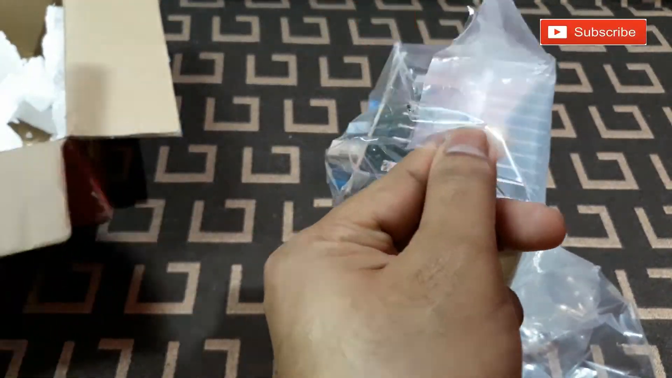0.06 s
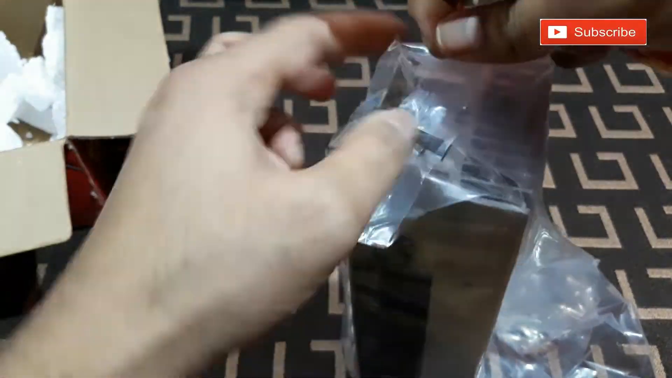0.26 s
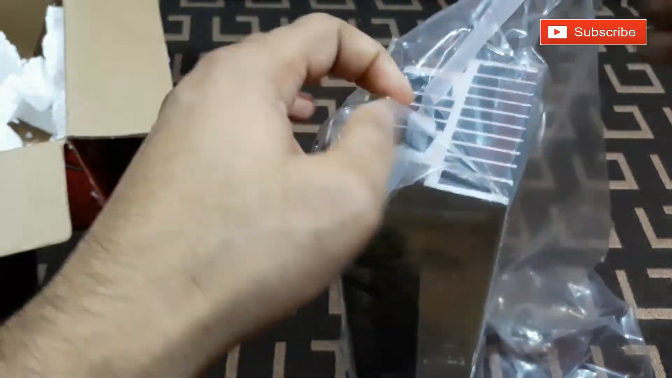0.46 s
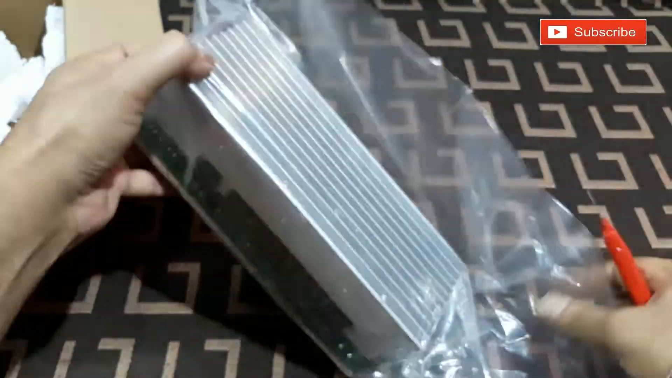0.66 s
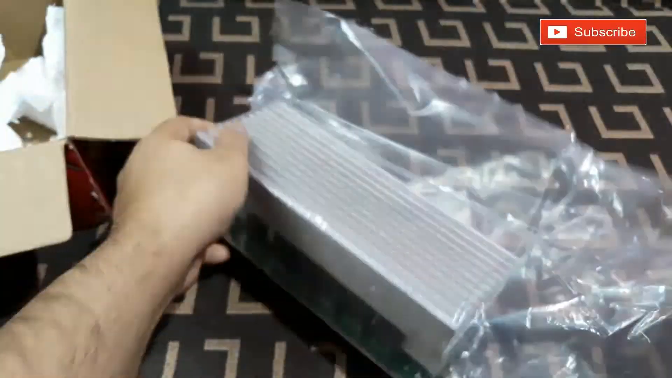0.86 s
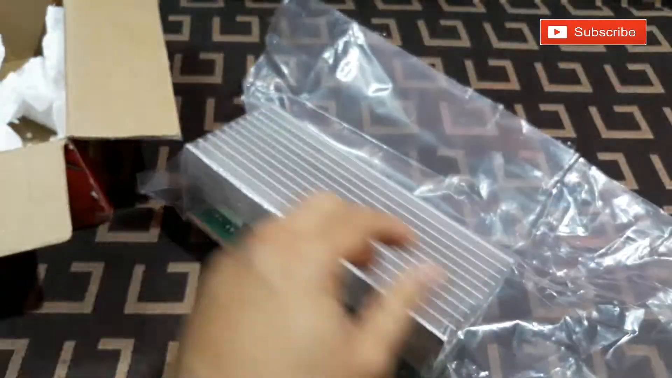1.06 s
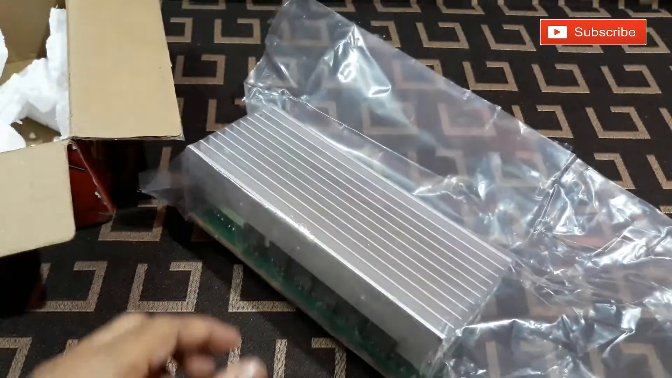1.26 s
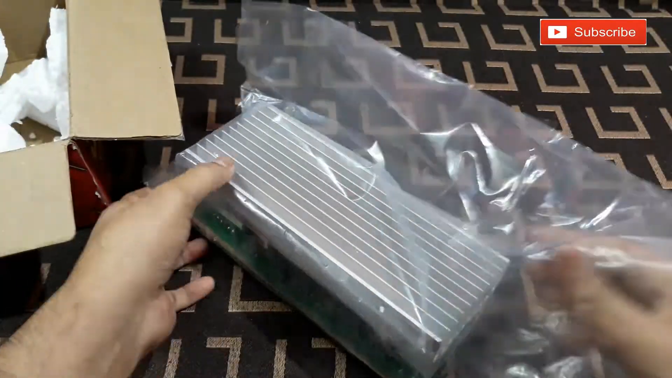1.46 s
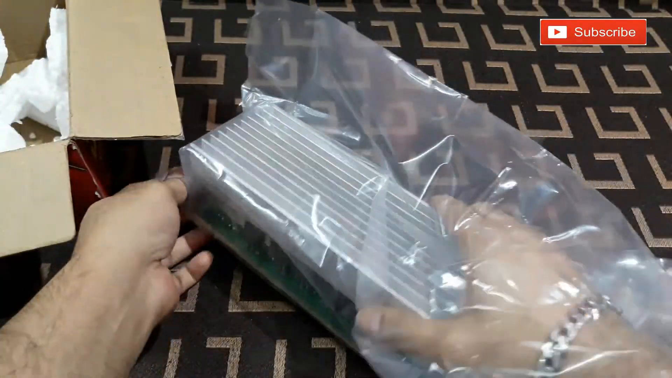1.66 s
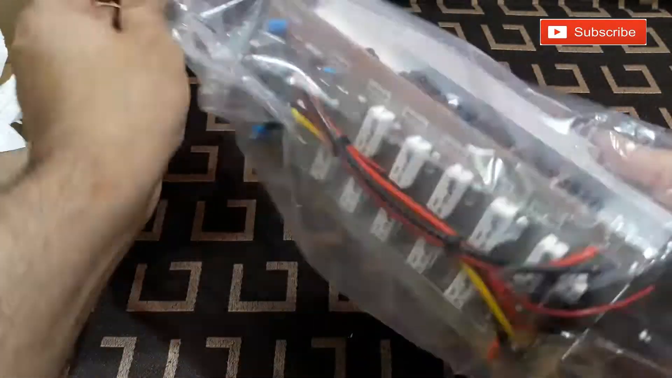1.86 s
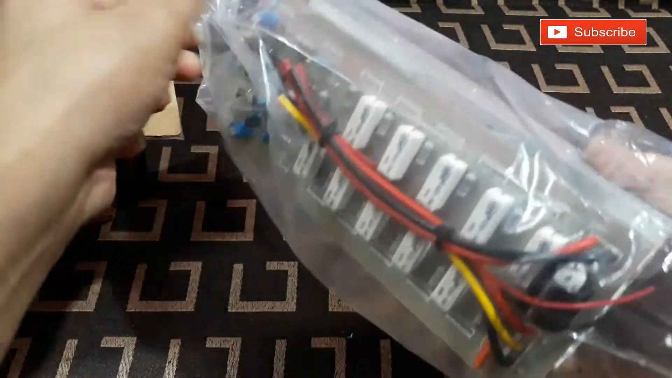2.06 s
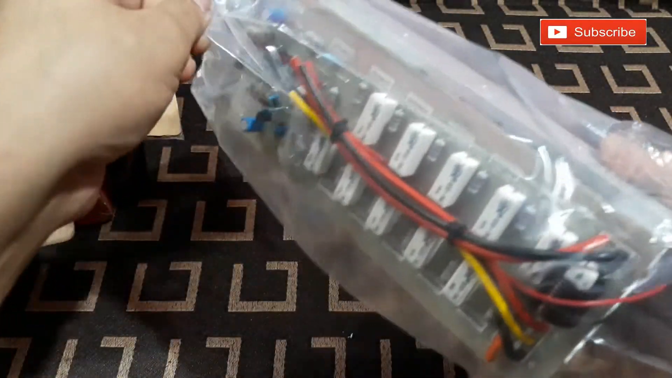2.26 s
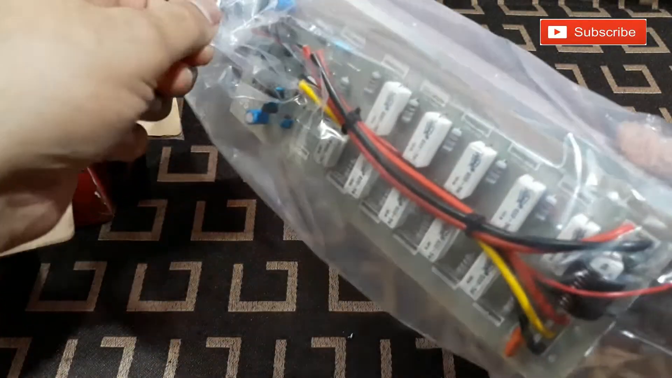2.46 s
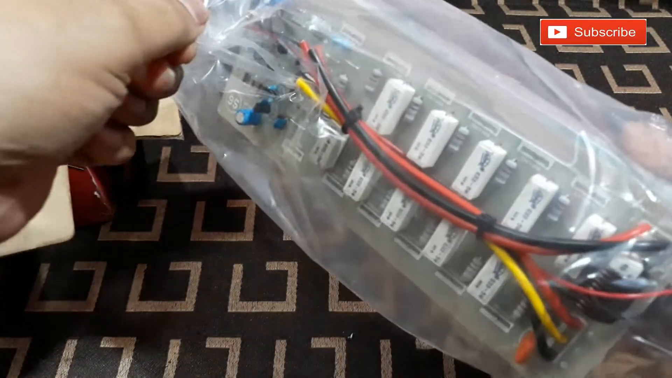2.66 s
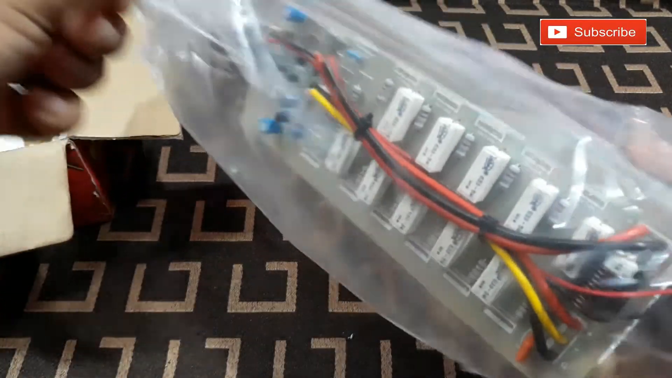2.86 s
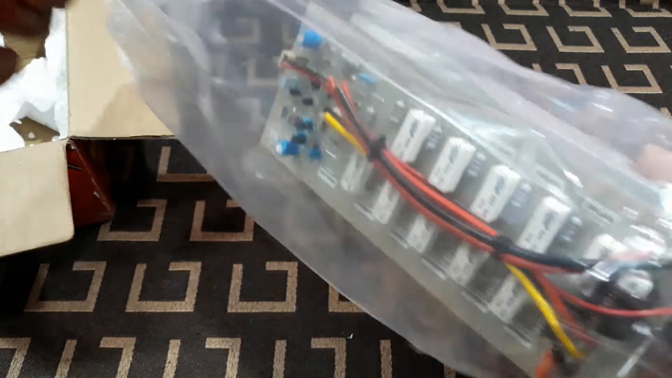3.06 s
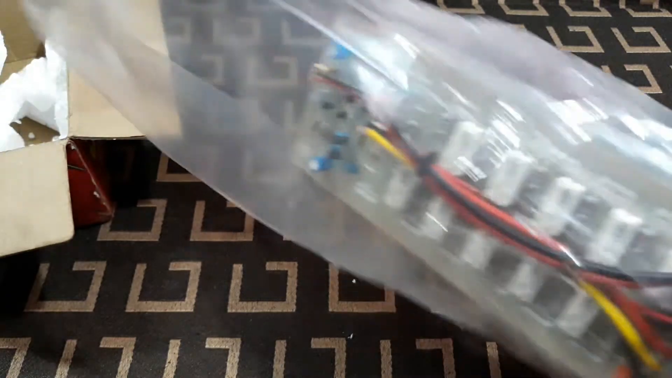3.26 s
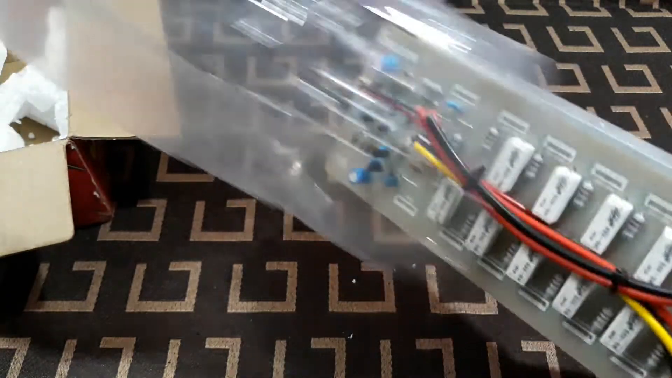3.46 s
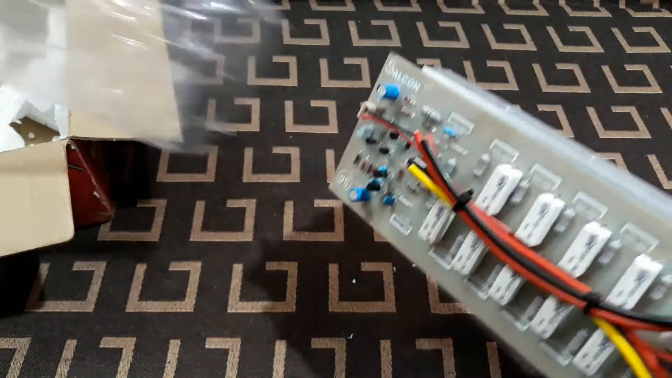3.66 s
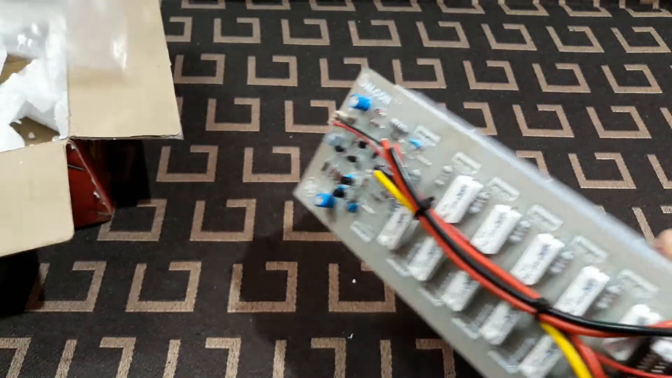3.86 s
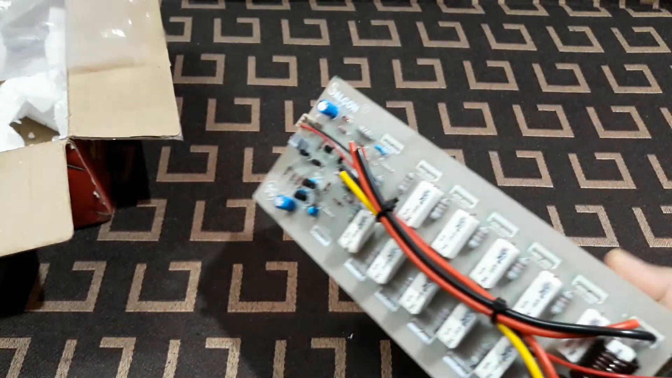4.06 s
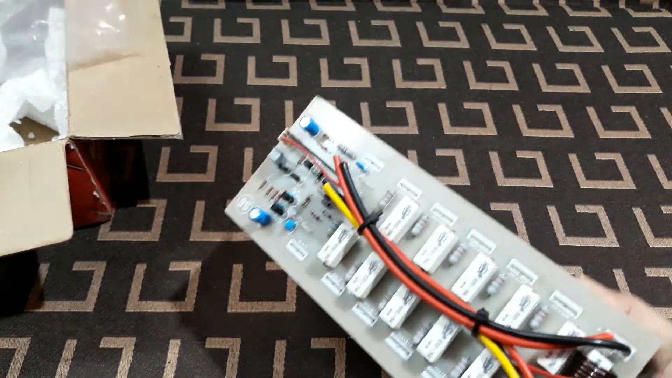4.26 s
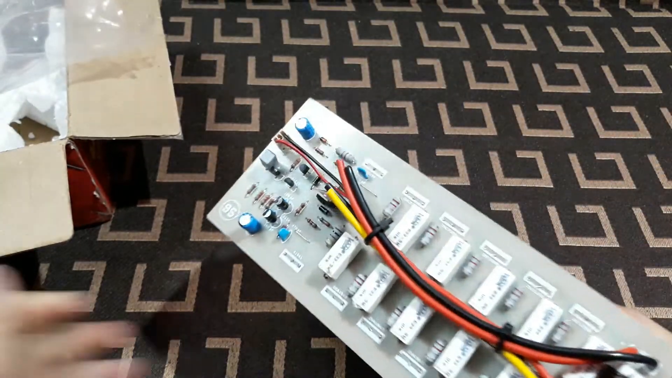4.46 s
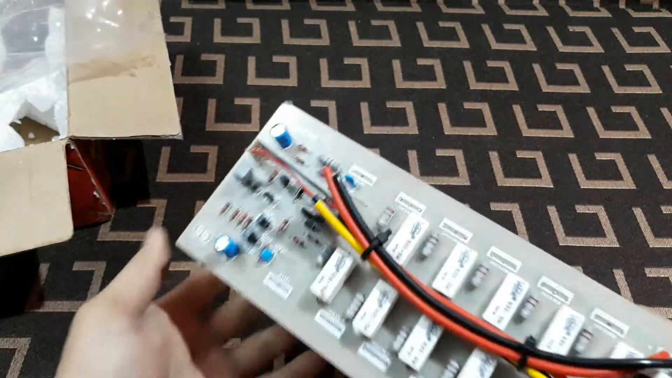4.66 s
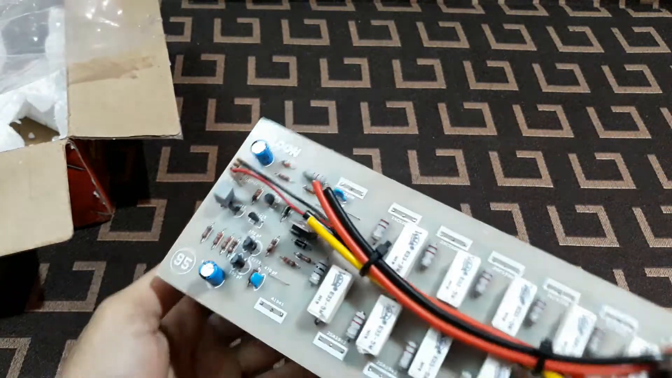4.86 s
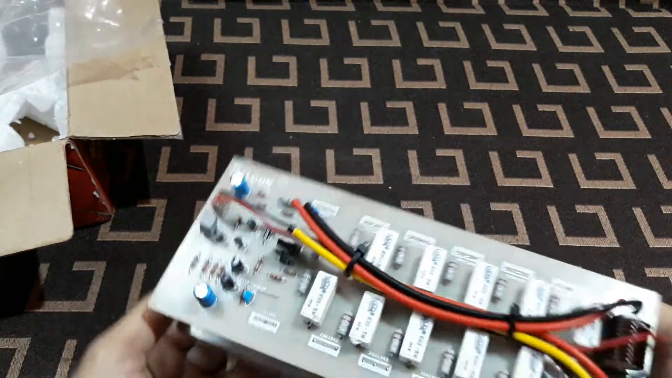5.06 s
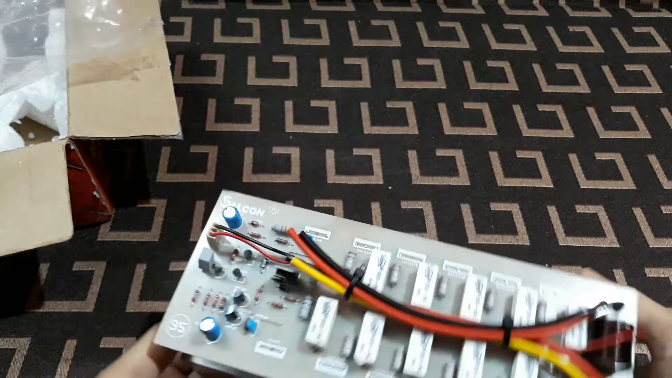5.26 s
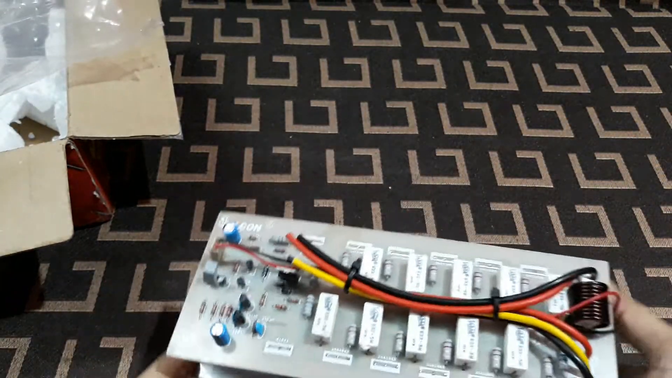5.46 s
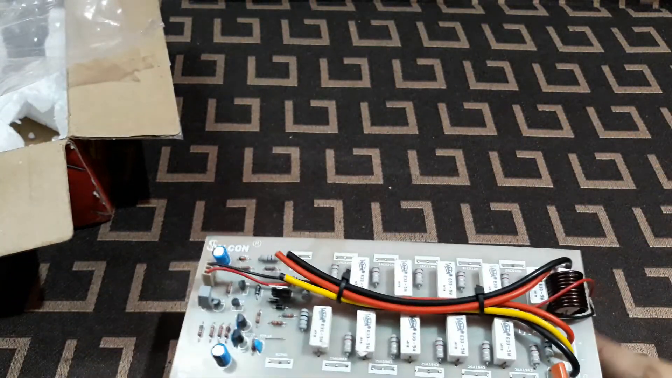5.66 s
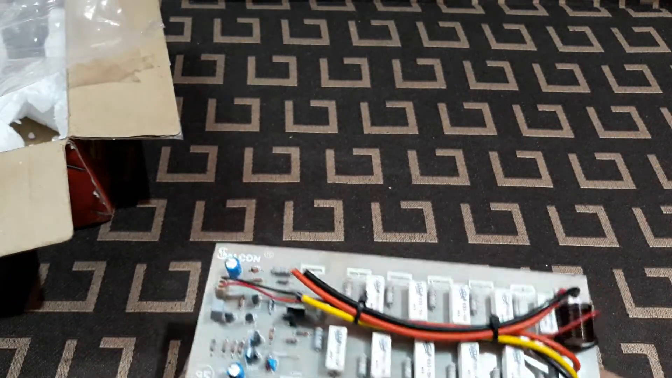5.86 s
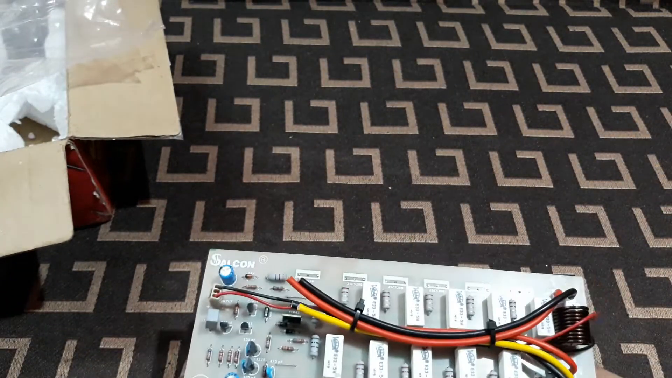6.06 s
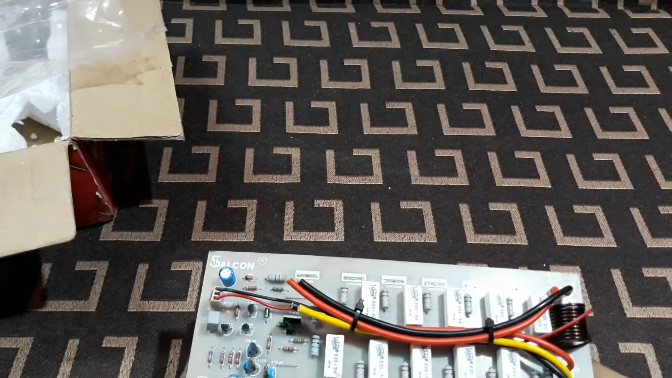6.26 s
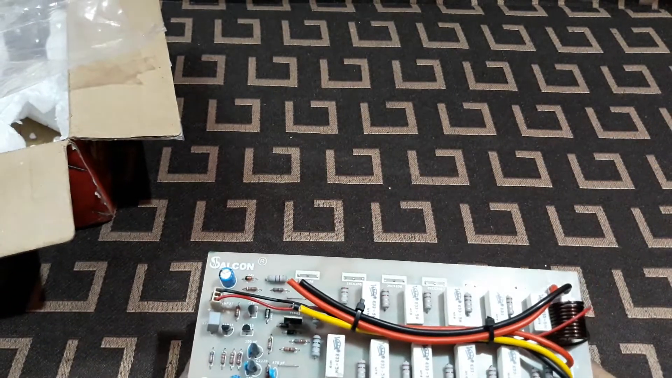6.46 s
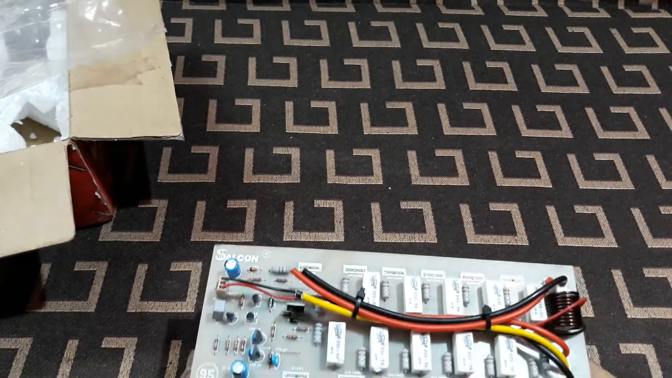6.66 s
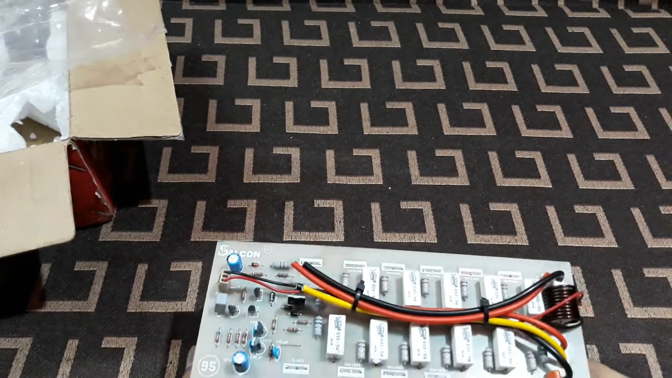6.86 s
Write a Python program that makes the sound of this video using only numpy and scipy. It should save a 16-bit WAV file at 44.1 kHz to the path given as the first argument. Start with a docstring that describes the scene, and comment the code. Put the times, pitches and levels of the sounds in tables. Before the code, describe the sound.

Hands tear and crumple stiff clear plastic film in bright crackles and snaps, then fingers softly rub and tap a finned metal board.

```python
"""Unwrapping a finned board

Hands tear and crumple a clear plastic bag close to a phone in a carpeted room and pull a finned board out.
Clumped creases and filtered noise make the film rustle; ringing noise bursts make it snap, low noise thumps.
Damped sines knock as a cutter is put down and the load picked up; rough tones chirp as taut film slides off.
Then fingers slide over the board, with noise and squeaky sines, and rub and tap its resonant fins. Wavering
mains tones and a faint hiss are the room; at times the stereo image narrows to the centre."""
import sys
import numpy as np
from scipy import signal
from scipy.fft import rfft, irfft, next_fast_len
from scipy.io import wavfile
from scipy.ndimage import uniform_filter1d, map_coordinates

SR = 44100
rng = np.random.default_rng(int(sys.argv[2]) if len(sys.argv) > 2 else 0)


def generate_wav(sig):
    """Save sig (samples, or channels by samples) to the path in sys.argv[1] as 16-bit PCM at SR."""
    pcm = np.round(np.clip(np.atleast_2d(sig).T, -1, 1) * 32767).astype(np.int16)
    wavfile.write(sys.argv[1], SR, pcm)


N = 304727


def amp(db):
    """Gain of a level in dB."""
    return 10 ** (np.asarray(db) / 20)


def unit(x):
    """x at rms 1."""
    return x / np.sqrt(np.mean(x ** 2) + 1e-20)


def along(points, hz):
    """Values at hz, joined through (Hz, value) points on a log axis."""
    f, v = np.transpose(points)
    return np.interp(np.log(hz + 1), np.log(f + 1), v)


def curves(rows):
    """One curve for each column after the time, and a soft-edged gate open while the rows last."""
    s, *cols = np.transpose(rows)
    t = np.arange(N) / SR
    is_open = 1. * (t >= s[0]) * (t <= s[-1])
    gate = uniform_filter1d(is_open, size=600, mode="nearest")
    return [np.interp(t, s, c) for c in cols] + [gate]


def wobble(rate):
    """A smooth random curve, rate knots a second."""
    knots = rng.standard_normal(int(N * rate / SR) + 4)
    return map_coordinates(knots, [np.arange(N) * rate / SR])


def filtered(x, response):
    """x times a response of frequency."""
    m = next_fast_len(x.shape[-1] + 8192)
    spectrum = rfft(x, m) * response(np.fft.rfftfreq(m, 1 / SR))
    return irfft(spectrum, m)[..., :x.shape[-1]]


def causal(spectrum):
    """Minimum-phase impulse response with this spectrum, by folding its cepstrum."""
    db = np.maximum(along(spectrum, np.fft.rfftfreq(2048, 1 / SR)), -60)
    cepstrum = irfft(np.log(amp(db)))
    cepstrum[1:1024] *= 2
    cepstrum[1025:] = 0
    return irfft(np.exp(rfft(cepstrum)))[:1024]


def thirds(x):
    """Low, middle and treble parts of x, each scaled to rms 1."""
    low = signal.sosfilt(signal.butter(5, 1500, "low", fs=SR, output="sos"), x)
    mid = signal.sosfilt(signal.butter(5, [1500, 8700], "band", fs=SR, output="sos"), x)
    top = signal.sosfilt(signal.butter(3, 8700, "high", fs=SR, output="sos"), x)
    return unit(low), unit(mid), unit(top)


def noise(spectrum):
    """Steady noise of rms 1."""
    return unit(filtered(rng.standard_normal(N), lambda hz: amp(along(spectrum, hz))))


def strokes(rows):
    """Gain of overlapping strokes that swell, hold and fade; then the same gain for each of their parts."""
    swell_db = 14  # how far below its level a stroke sets in
    power, t = np.zeros((len(rows[0]) - 4, N)), np.arange(SR) / SR
    for s, swell, hold, fade, db, *parts_db in rows:
        peak_s = max(swell, 1e-3)
        rise_db = -swell_db * np.clip(1 - t / peak_s, 0, 1)
        fall_db = -20 * np.clip(t - peak_s - abs(hold), 0, 9) / max(fade, .004)
        part = power[:, round(abs(s) * SR):][:, :SR]
        shape = amp(rise_db + fall_db)[:part.shape[1]]
        levels = amp(db + np.array([0, *parts_db]))[:, None]
        part += (levels * shape) ** 2
    return np.sqrt(power + 1e-20)


# Mains tones in the room. Each row: frequency in Hz, rms level in dB before wobble and sway.
HUM_TONES = [(301.5, -62), (349.9, -79.5), (398.4, -74.5), (500.6, -80.5)]
# Hiss of the room air at the microphone. Each row: frequency in Hz, relative level in dB per Hz.
AIR_SPECTRUM = [(15, -41), (40, -8.5), (100, -3.5), (200, -5), (450, -9), (620, -22), (1500, -24.5),
                (3500, -23), (7500, -24.5), (10000, -37), (13000, -28.5), (16500, -26.5)]
# The room is fainter at first. Each row: time in seconds, gain in dB.
ROOM_GAIN = [(0, -4.5), (.4, -2.5), (.84, -4.5), (1.2, 0), (6.91, 1)]


def room():
    """Mains tones, slightly unsteady in level and phase, over steady noise for the hiss."""
    t = np.arange(N) / SR
    hum = 0
    for hz, db in HUM_TONES:
        level = np.sqrt(2) * amp(db + 1.2 * wobble(24))
        hum = hum + level * np.sin(2 * np.pi * hz * t + 0.41 * wobble(6))
    return amp(curves(ROOM_GAIN)[0]) * (hum + amp(-64) * noise(AIR_SPECTRUM))


def grains(count, spread_db, cycles, size):
    """Tiny creases: damped sines at scattered pitches, a few much larger than the rest."""
    when, pitch, chance = rng.random((count, 3)).T
    hz = 500 * 30 ** pitch
    k = np.arange(size)
    phase = hz[:, None] * k / SR  # in cycles
    height = amp(-spread_db * np.log(chance + 0.0042))[:, None] * np.sqrt(hz[:, None])
    shape = height * np.exp(-phase / cycles) * np.sin(2 * np.pi * phase)
    places = (when * N).astype(int)[:, None] + k
    return unit(np.bincount(places.ravel(), shape.ravel(), N + size)[:N])


# Colour of the film close to the microphone. Each row: frequency in Hz, relative level in dB per Hz.
FILM_SPECTRUM = [(150, -34.5), (250, 0.5), (570, -6.5), (931, -4), (1170, 0), (2050, -3), (2400, 0),
                 (2960, -1), (4350, 2.5), (7500, -4), (9750, -15.5), (14600, -9), (16500, -24)]
# Squeezes and pulls of the film. Each row: start, swell and hold in seconds, fade in seconds for 20 dB
# (4 ms at least), level in dB, then low part, treble part and thump of the load in dB relative to it,
# all levels before trim.
FILM_STROKES = [(0, 0, 0.023, .016, -35.5, -6, -13.5, -15), (.09, 0.034, .07, 1, -66, -4, -16, -20),
                (.212, .003, .02, 0.15, -53, -9, -14, -25),
                (.236, 0.0075, 0.015, .02, -47.5, -2.5, -20, -20),
                (.3, 0.00066, 0.029, .018, -33.5, -2, -11.5, -21.5),
                (.405, 0.012, .01, 0.08, -45, -5, -12, -13.5),
                (.435, 0.01, 0.022, 0.12, -48.5, -7, -12, -12),
                (.475, 0.0038, 0.014, -0.02, -38.5, 0, -7, -15),
                (.49, 0.0095, 0.0017, -0.002, -26, -1.5, -2, -18), (.52, 0, 0.063, .1, -56, -5, -16, -30),
                (.608, 0.027, .007, 0.0054, -33.5, -6.5, -13.5, -15.5),
                (.65, 0, 0.023, 0.17, -51.5, -3.5, -17, -20),
                (.735, 0.0071, 0.03, -0.03, -54.5, 0, -23, -9.5),
                (.8, 0.0051, 0.00044, -0.1, -41, 1, -6, -21), (.85, 0, 0, 0.22, -44.5, -12, -9, -23),
                (.87, 0.096, 0.046, 0.1, -32.5, -5, -14.5, -16),
                (1.118, 0.0042, 0.035, .01, -26.5, -7.5, -12.5, -25),
                (1.165, 0, 0.025, 0.17, -51.5, -10, -13.5, -20),
                (1.43, .028, .004, .018, -51, -26, -2, -25), (1.5, .01, .015, .03, -53, 2, -18, -14),
                (1.525, .012, 0, .12, -43, -9, -6, -13), (1.635, 0.045, 0.0088, 0.17, -31, -4, -17, -17),
                (1.773, 0.00038, 0, 0.1039, -29, -8.5, -15, -22),
                (1.82, 0.029, 0.083, .13, -40, -7, -15.5, -19),
                (2.026, 0.042, 0, 0.08, -29.5, -6, -20, -22),
                (2.105, 0.031, 0.00051, 0.05, -33, -8.5, -15.5, -20),
                (2.15, .01, 0.016, .012, -44.5, -8, -13, -20),
                (2.185, 0.011, 0.023, 0.1, -62, -2.5, -5, -14),
                (2.314, 0.0032, .01, 0.5, -55, -4, -17, -20),
                (2.331, 0.0061, 0.014, 0.22, -37, -10, -18, -24),
                (2.365, 0.019, 0.031, 0.05, -36.5, -4.5, -17, -20),
                (2.43, 0.063, 0.0012, 0.12, -35, -9.5, -14.5, -19),
                (2.539, 0.014, 0.014, -0.06, -29, -11.5, -3.5, -26.5),
                (2.57, 0.016, 0.012, 0.04, -25, -11.5, -14.5, -24),
                (2.605, 0.0038, .01, 0.11, -31, -7.5, -11.5, -19.5),
                (2.64, 0.017, .03, .14, -36, -6, -22, -17), (2.77, .01, .02, .15, -49, -4, -20, -14),
                (2.84, .04, .02, .12, -50, -5, -20, -14), (2.935, .004, .004, .1, -46.5, -12, -12, -20),
                (2.995, .005, .03, .03, -50, -9, -8, -15), (3.03, 0.015, 0.024, 0.24, -27, -10, -16, -16),
                (3.15, 0.0084, 0.0057, 0.08, -28, -6.5, -11.5, -18.5),
                (3.298, .002, 0, 0.3, -44.5, -30, -23, -27), (3.33, 0.00025, .03, .2, -46, -7, -15, -13),
                (3.4, .025, .01, .1, -46, -6, -14, -16), (3.46, .02, .04, .1, -49, -6, -9, -12),
                (3.53, .13, 0.00072, .15, -38, -5, -15, -23), (3.69, 0.069, 0.028, .1, -39.5, -9, -11, -24),
                (3.872, 0, 0, 0.2, -43, -6, -16, -12.5), (3.93, 0.048, 0, 0.13, -38, -13, -14, -23),
                (4.0, 0.016, 0.29, .2, -40, -7, -17, -25), (4.3, 0.048, .015, .085, -40.5, -8, -8, -14)]


def rustle():
    """Dense small creases and ringing pockets of taut film over a sliding hiss, coming in clumps."""
    level, low_level, top_level, _ = strokes(FILM_STROKES)
    clumps = amp(0.52 * wobble(60) + 2.18 * wobble(250))
    creases = grains(count=14000, spread_db=1.5, cycles=1.4, size=200)
    pockets = grains(count=2500, spread_db=3.0, cycles=24, size=1200)
    cracks = grains(count=1200, spread_db=2.8, cycles=1.2, size=120)
    hiss = rng.standard_normal(N)
    sheet = 0.84 * creases + 0.55 * cracks + 0.55 * pockets + 1.3 * hiss
    low, mid, top = thirds(signal.fftconvolve(clumps * sheet, causal(FILM_SPECTRUM))[:N])
    # crisp film is brighter already below the treble
    edge = filtered(mid, lambda hz: 1 / (1 + (5500 / (hz + 1)) ** 6))
    crispness = (amp(9.5) * top_level / level) ** 0.56
    mid = mid + (crispness - 1) * edge
    return amp(-2.5) * level * mid + amp(-0.38) * low_level * low + amp(-1.05) * top_level * top


# Weight of the bag and its load. Each row: frequency in Hz, relative level in dB per Hz.
THUD_SPECTRUM = [(15, -52), (45, -22), (80, -2.5), (140, 1), (260, 0), (400, -9), (700, -39.5),
                 (1100, -120)]


def handling():
    """Low puffs and bumps of the bag and its load, which follows each squeeze sluggishly."""
    lag_s = 0.0048
    load = strokes(FILM_STROKES)[-1]
    keep = np.exp(-1 / (lag_s * SR))
    sluggish = np.sqrt(signal.lfilter([1 - keep], [1, -keep], load ** 2))
    puffs = unit(amp(2.7 * wobble(40)) * noise(THUD_SPECTRUM))
    return amp(2.5) * sluggish * puffs


def snap(t60, hz, colour):
    """A sharp crack and a dying rattle through a colour, with a peak at hz; three parts at peak 1."""
    t = np.arange(SR // 10) / SR
    decay = 0.42 * amp(-60 * t / max(t60, .004)) + amp(-60 * t / 0.0044)
    rattle = rng.standard_normal(len(t)) * decay
    rattle[0] += 4.5  # the crack
    low, mid, top = thirds(signal.fftconvolve(rattle, colour)[:len(t)])
    mid = mid + 1.3 * signal.lfilter(*signal.iirpeak(hz, 3.5, SR), mid)
    return [part / abs(part).max() for part in (low, mid, top)]


# Creases that flip. Each row: start in seconds, level in dB, ring in Hz, low part and treble part
# in dB relative to the level, all levels before trim.
CREASE_FLIPS = [(0.1007, -45, 5730, -21, -22), (0.1693, -32, 3080, -6, -27), (0.2024, -43, 1630, -5, -15),
                (0.2166, -26.5, 3590, -26, -13), (0.2404, -27, 5100, -14, -17),
                (0.258, -21.5, 4730, -15, -19), (0.2919, -36, 1500, -1, -26), (0.3043, -10, 4320, -25, -29),
                (0.385, -43.5, 7100, -23, -6), (0.4164, -23.5, 1880, -22, -12),
                (0.4417, -27.5, 2140, -12, -17), (0.4454, -32, 5770, -6.5, -8),
                (0.476, -14.5, 7310, -14.5, -13), (0.4959, -7.5, 3730, -17, -23),
                (0.6141, -30, 2920, -24, -24), (0.6237, -24, 2740, -27, -23), (0.6342, -18, 2620, -24, -22),
                (0.668, -29.5, 1570, -25, -18), (0.7005, -31.5, 4110, -29, -17),
                (0.7397, -38, 2560, -17, -27), (0.761, -30, 2100, -8, -14), (0.7724, -38, 4150, -13, -28),
                (0.7904, -34, 1500, -15, -21), (0.8044, -22.5, 1910, -28, -21),
                (0.8505, -23.5, 4340, -16, -16.5), (0.8813, -31.5, 1530, -1, -22),
                (0.8976, -24, 3810, -12, -28), (0.9244, -28, 5110, -6, -26), (0.941, -16.5, 4650, -31, -41),
                (0.957, -17.5, 4580, -10, -19), (0.9729, -12, 1850, -12, -19),
                (0.9842, -15.5, 3680, -22, -10), (0.9988, -11, 4990, -29, -6),
                (1.0625, -28, 2330, -17, -32), (1.0934, -31, 1720, -1, -28), (1.1209, -19, 2600, -15, -27),
                (1.1334, -24.5, 2480, -16, -19), (1.1438, -9, 4810, -37, -24),
                (1.1529, -15, 3390, -29, -18), (1.1964, -40, 5030, -17, -20),
                (1.2028, -33.5, 5520, -7.5, -22), (1.2132, -40, 4830, -8, -27),
                (1.4591, -34, 7880, -29, -8), (1.5287, -26.5, 3410, -11, -7), (1.5725, -28, 4090, -11, -34),
                (1.5958, -19.5, 3560, -13.5, -34), (1.64, -26, 3390, -7.5, -11),
                (1.6618, -20.5, 5310, -11, -14), (1.6908, -11.5, 4790, -14, -23),
                (1.7736, -13.5, 4500, -19, -19), (1.7772, -13, 4220, -22, -23),
                (1.8008, -18, 4400, -10.5, -24), (1.8104, -17.5, 5450, -29, -20),
                (1.8674, -23, 2680, -29, -32), (1.9041, -28, 4530, -15, -31),
                (1.9148, -21.5, 3670, -11, -25), (1.936, -16, 3840, -32, -30),
                (1.9616, -29.5, 4520, -19, -21), (1.9905, -21, 4360, -17.5, -19),
                (2.028, -15.5, 3760, -17, -20), (2.0492, -23, 2360, -12, -21),
                (2.0712, -14, 2660, -19, -16), (2.0778, -10, 5220, -28, -17.5),
                (2.14, -17, 4610, -17, -12.5), (2.167, -26, 1500, -23, -29), (2.335, -18, 4220, -22, -25),
                (2.374, -15, 4460, -23, -22), (2.3966, -20, 1730, -11.5, -29),
                (2.4139, -19.5, 5400, -16, -29), (2.4366, -27, 5180, -22, -21),
                (2.4508, -29, 4620, -17, -31), (2.4588, -26, 2790, -19, -17),
                (2.4743, -18, 4330, -21.5, -18), (2.4927, -14.5, 5470, -20, -16),
                (2.5414, -10, 3130, -27, -19), (2.5626, -19.5, 4290, -18, -20),
                (2.5782, -18.5, 2480, -16.5, -19), (2.587, -15.5, 2290, -20, -16),
                (2.5946, -3, 5950, -29, -25), (2.6353, -21, 5430, -13, -21),
                (2.6564, -15.5, 2640, -16, -25), (2.6741, -14.5, 2330, -15.5, -27),
                (2.6858, -14, 2420, -25, -37), (2.7194, -29, 1560, -11, -27), (2.7314, -32, 2300, -10, -29),
                (2.7767, -24.5, 2220, -19, -43), (2.8784, -26, 2410, -6, -36),
                (2.8942, -25, 2440, -13, -33), (2.9371, -22.5, 7330, -30, -3.5),
                (2.9994, -29.5, 5250, -19.5, -24), (3.0141, -27.5, 5670, -13, -25),
                (3.0342, -14.5, 2330, -14.5, -14.5), (3.043, -2, 2450, -27, -18.5),
                (3.113, -17, 4010, -10, -19), (3.1254, -14.5, 2610, -10, -14.5),
                (3.1504, -24, 1500, -11, -10), (3.1636, -10.5, 3530, -46.5, -11),
                (3.1894, -20, 1830, -16, -26), (3.2399, -26, 2320, -16, -15),
                (3.3016, -23.5, 3390, -27, -25), (3.3597, -31, 2390, -20, -29),
                (3.4825, -31.5, 1570, -5.5, -29), (3.5425, -31, 1500, -4.5, -15),
                (3.5889, -28, 2870, -10, -18), (3.6157, -28, 4010, -15, -23), (3.6324, -26, 1700, -12, -28),
                (3.6616, -27, 3860, -16.5, -26), (3.7325, -23.5, 3710, -25, -23),
                (3.7763, -24.5, 2830, -17, -26), (3.8766, -26, 4150, -13, -30),
                (4.0388, -28, 3890, -25, -25), (4.0652, -31, 3590, -20, -22), (4.1302, -30, 2360, -17, -17),
                (4.2073, -28.5, 3250, -17, -26), (4.2144, -29, 1980, -12, -25),
                (4.3524, -19, 5030, -32, -10), (4.3794, -33, 4150, -16, -15)]


def snaps():
    """Each crease flips over with its own pitch, weight and brightness."""
    out, colour = np.zeros(N + SR), causal(FILM_SPECTRUM)
    for s, db, hz, low_db, top_db in CREASE_FLIPS:
        low, mid, top = snap(0.033, hz, colour)
        flip = mid + amp(low_db + 2.6) * low + amp(top_db + 7) * top
        out[round(s * SR):][:len(mid)] += amp(db - 1.2) * flip
    return out[:N]


def knocks(events, modes, attack, crack):
    """Every blow cracks and rings the same modes, each mode at a level that varies from blow to blow."""
    out, t = np.zeros(N + SR), np.arange(SR // 4) / SR
    for s, db in events:
        ring = 0
        for hz, level, t60 in modes:
            ring = ring + amp(level + rng.normal(0, 3.7) - 60 * t / t60) * np.sin(2 * np.pi * hz * t)
        contact = crack * thirds(rng.standard_normal(len(t)))[1] * amp(-60 * t / 0.047)
        out[round(s * SR):][:len(t)] += amp(db) * (ring * (1 - np.exp(-t / attack)) + contact)
    return out[:N]


# A small cutter is put down and bounces. Each row: start in seconds, strength in dB.
CUTTER_BLOWS = [(1.261, -46), (1.2705, -21.5), (1.279, -40), (1.2855, -37), (1.292, -40), (1.3276, -38),
                (1.3553, -58)]
# Modes of the cutter. Each row: frequency in Hz, mean level in dB, time to fall 60 dB in seconds.
CUTTER_MODES = [(2514, 0.5, 0.022), (2620, -1, 0.01), (3180, -8, 0.0071), (3900, -3, 0.0089),
                (5420, -9, 0.0068)]


def cutter():
    """The cutter's shell rings high and briefly at each blow."""
    return knocks(CUTTER_BLOWS, CUTTER_MODES, attack=0.00076, crack=0.13)


# The wrapped board is picked up with a bump. Each row: start in seconds, strength in dB.
LOAD_BLOWS = [(1.502, -44), (1.514, -42), (1.5255, -23), (1.54, -38), (1.552, -40)]
# Modes of the load. Each row: frequency in Hz, mean level in dB, time to fall 60 dB in seconds.
LOAD_MODES = [(79.6, -9.5, 0.1), (111, -8, 0.07), (179, 1, 0.034), (300, 4, .018), (554, 1, 0.021),
              (780, -5, .015)]


def pickup():
    """The heavier load rings low at each blow."""
    return knocks(LOAD_BLOWS, LOAD_MODES, attack=0.0016, crack=.02)


# Taut film sings briefly as it slides off the board. Each row: start in seconds, pitch in Hz,
# level in dB, length in seconds.
FILM_CHIRPS = [(3.657, 3900, -35.5, 0.017), (3.723, 2800, -39.5, 0.023), (3.763, 2850, -37, 0.048),
               (3.964, 2620, -43, 0.063), (4.0, 850, -42.5, 0.042), (4.15, 1890, -40.5, 0.028),
               (4.209, 1400, -43, 0.027), (4.254, 1417, -42, 0.07)]


def chirps():
    """Short tones under a smooth swell, roughened by a random walk of the phase."""
    out = np.zeros(N)
    for s, hz, db, length in FILM_CHIRPS:
        t = np.arange(round(length * SR)) / SR
        wander = np.cumsum(rng.normal(0, 0.11, len(t)))
        tone = np.sin(2 * np.pi * hz * t + wander)
        out[round(s * SR):][:len(t)] += amp(db) * np.sin(np.pi * t / length) * tone
    return out


# A hand slides along the board. Each row: time in seconds, level in dB, low part in dB relative to it,
# both before trim.
HAND_SLIDE = [(4.4, -56, 2), (4.458, -60, 1), (4.606, -51.5, -19.5), (4.714, -57, -8), (4.828, -52.5, -6.5),
              (4.852, -55.5, -4), (5.01, -65, -3), (5.03, -51.5, -12), (5.15, -74, -18)]
# Colour of skin on the board. Each row: frequency in Hz, relative level in dB per Hz.
SKIN_SPECTRUM = [(290, -5), (500, -8), (800, -5), (1200, -17), (1750, -22), (2200, -4), (2700, -13),
                 (3150, -0.5), (4100, -0.5), (5000, -8), (5800, -13), (7300, -12), (9000, -24.5),
                 (16000, -19)]
# A thin squeak in the slide. Each row: time in seconds, pitch of its fourth multiple in Hz,
# level in dB before the trim of each multiple.
SQUEAK_PATH = [(4.47, 11800, -85), (4.56, 12801, -75), (4.586, 12770, -76), (4.68, 12087, -75),
               (4.72, 11714, -84), (4.8, 12400, -86), (4.86, 11500, -84)]
# A second, lower strand of the squeak. Each row: time in seconds, pitch in Hz, level in dB before trim.
STRAND_PATH = [(4.61, 8900, -80), (4.648, 9557, -76), (4.724, 8750, -77), (4.77, 9000, -86),
               (4.805, 9658, -79), (4.87, 8738, -82)]


def slide():
    """Smooth skin hiss with faint squeaks, one of them heard in its upper multiples."""
    db, low_db, gate = curves(HAND_SLIDE)
    low, mid, top = thirds(noise(SKIN_SPECTRUM))
    skin = mid + amp(low_db + 1.8) * low + amp(-20) * top
    hiss = amp(db - 0.9 + 0.86 * wobble(30)) * skin
    hz, squeak_db, squeak_gate = curves(SQUEAK_PATH)
    turns = np.cumsum(hz * (1 + .002 * wobble(80))) / SR / 4  # cycles of the unheard fundamental
    squeak = 0
    for multiple, trim_db in ((3, -3), (4, 1.5), (5, -1.5)):
        squeak = squeak + amp(trim_db) * np.sin(2 * np.pi * multiple * turns)
    hz, strand_db, strand_gate = curves(STRAND_PATH)
    strand = np.sin(2 * np.pi * np.cumsum(hz * (1 + .002 * wobble(80))) / SR)
    squeaks = squeak_gate * amp(squeak_db) * squeak + strand_gate * amp(strand_db - 1) * strand
    return gate * hiss + squeaks


# Resonances of the fins. Each row: frequency in Hz, width in Hz, gain in dB.
FIN_MODES = [(1132, 36, 11), (1430, 29, 5), (1937, 53, 2), (2647, 49, 3), (2940, 42, 7), (3660, 46, 8),
             (4370, 64, 5.5), (4840, 55, 10), (5650, 66, 13), (7000, 24, -2), (12020, 88, 7)]
# Colour of rubbing before the fins ring. Each row: frequency in Hz, relative level in dB per Hz.
RUB_SPECTRUM = [(350, -61), (800, -33), (1050, -10), (2200, -2.5), (3000, -0.5), (6000, -13), (8000, -18),
                (10000, -27), (15000, -21), (16500, -16)]
# Fingers rub the fins. Each row: start, swell and hold in seconds, fade in seconds for 20 dB
# (4 ms at least), level in dB, then treble part, low part and long fins in dB relative to it,
# all levels before trim.
FIN_RUBS = [(5.15, 0.021, .03, 0.6, -61.5, -17, -4, -5), (5.232, 0.0094, 0.034, .28, -56.5, -5, 0.5, -4),
            (5.49, 0.052, 0.032, 0.11, -57.5, -5, 0.5, 3), (5.58, 0.047, 0.098, .05, -60.5, -12, 2, 4.5),
            (5.695, 0.0089, 0.002, 0.01, -46, -25, -7, -8), (5.714, 0, 0.0017, 0.2, -52, -12, 1, 1),
            (5.79, 0.014, 0.13, 0.11, -55, -10.5, 0, 6), (5.93, 0.01, 0.053, 0.03, -63.5, -14, 0, 5),
            (6.23, 0.023, 0.095, -0.3, -82, -5, 3, 10.5), (6.33, .11, 0, 0.19, -74.5, -14, -16, -11),
            (6.52, 0.0059, 0.038, 0.18, -75, -7, 8, 2), (6.79, 0.049, 0.013, 1, -69, -13, -3.5, -11)]
# Nails on the board. Each row: start in seconds, level in dB before the fins ring,
# time for the rattle to fall 60 dB in seconds.
NAIL_TAPS = [(5.0173, -38.5, 0.017), (5.243, -43.5, 0.025), (5.7029, -30, 0.059), (5.9093, -43, 0.03)]


def fin_response(f):
    """The direct sound plus a resonance for each mode of the fins."""
    response = 1
    for centre, width, db in FIN_MODES:
        damping = 1j * f * width
        response = response + amp(db) * damping / (centre ** 2 - f ** 2 + damping)
    return response


def board():
    """Rubbing noise and nail taps ring the resonances of the fins."""
    level, top_level, low_level, long_level = strokes(FIN_RUBS)
    colour = causal(RUB_SPECTRUM)
    scrape = amp(1.6 * wobble(50)) * rng.standard_normal(N)
    rung = filtered(signal.fftconvolve(scrape, colour)[:N], fin_response)
    _, mid, top = thirds(rung)
    long_fins = unit(filtered(rung, lambda f: 1 / (1 + ((f - 2800) / 550) ** 4)))
    short_fins = unit(filtered(mid, lambda f: 1 / (1 + (3300 / (f + 1)) ** 8)))
    under = unit(filtered(rung, lambda f: 1 / (1 + (f / 2250) ** 12)))
    rubbed = level * short_fins + amp(-2.0) * low_level * under
    rubbed = rubbed + amp(6.0) * top_level * top + amp(-5.0) * long_level * long_fins
    taps = np.zeros(N + SR)
    for s, db, t60 in NAIL_TAPS:
        low, mid, top = snap(t60, 4200, colour)
        taps[round(s * SR):][:len(mid)] += amp(db) * (mid + 0.22 * low + .15 * top)
    return amp(2.0) * rubbed + filtered(taps[:N], fin_response)


# The stereo image narrows to the centre at times. Each row: time in seconds, share of the wave's slope put
# between left and right.
STEREO_WIDTH = [(0, 0.74), (2.12, 0.48), (2.14, 0.0013), (4.4, 0.0021), (4.42, 0.099), (5.5, 0.098),
                (5.52, 0.05), (5.95, 0), (6.0, 0.58), (6.91, 0.68)]


def scene():
    """All sources summed, with a share of the wave's slope added on the left and taken off on the right."""
    mid = room() + rustle() + handling() + snaps() + cutter() + pickup() + chirps() + slide() + board()
    slope = filtered(mid, lambda hz: -1j * np.sin(np.pi * hz / SR))
    side = curves(STEREO_WIDTH)[0] * slope
    return np.array([mid + side, mid - side])


def record(dry):
    """The phone's microphone loses the deepest bass and keeps almost nothing above its band limit."""
    low_hz, top_hz = 54, 15800
    thin = filtered(dry, lambda hz: 1j * hz / (low_hz + 1j * hz))
    return filtered(thin, lambda hz: 1 / (1 + (hz / top_hz) ** 300))


dry = scene()
out = record(dry)
generate_wav(out)
```